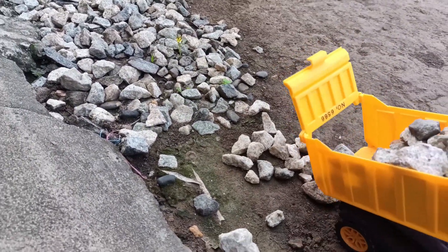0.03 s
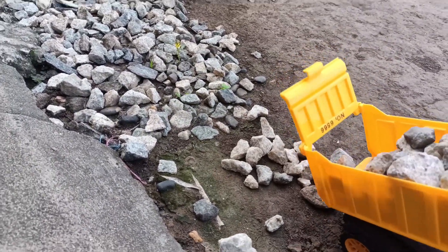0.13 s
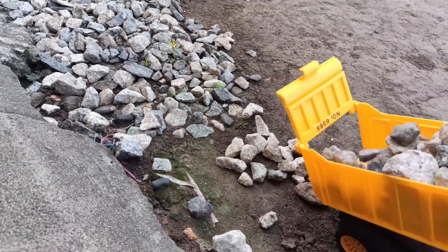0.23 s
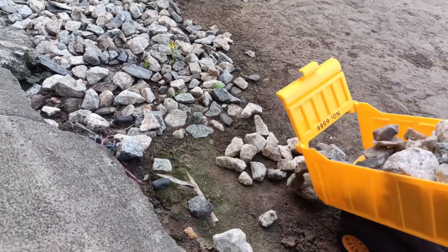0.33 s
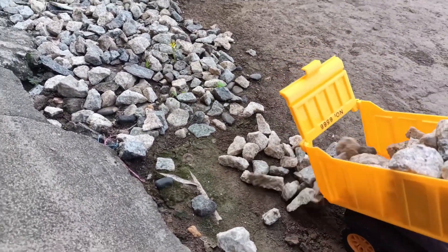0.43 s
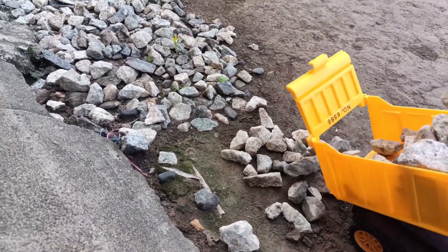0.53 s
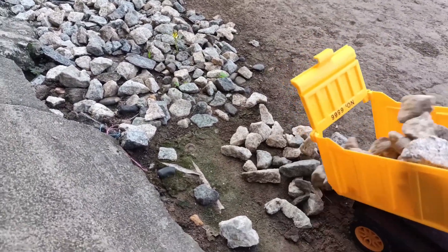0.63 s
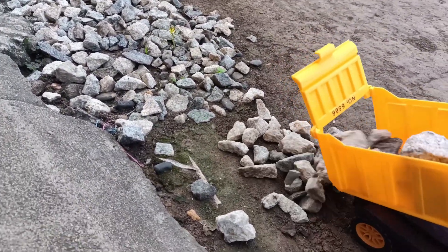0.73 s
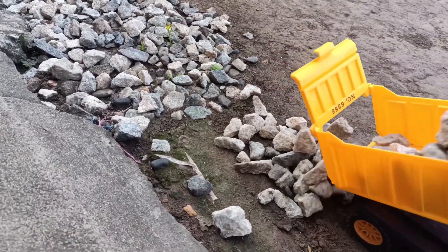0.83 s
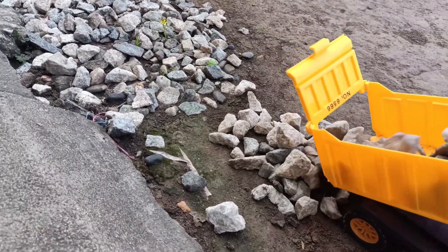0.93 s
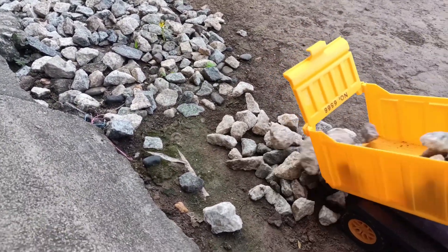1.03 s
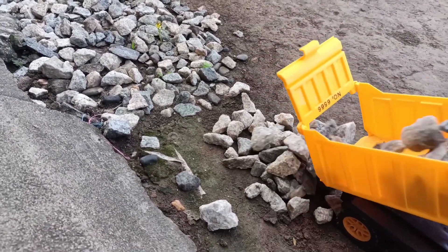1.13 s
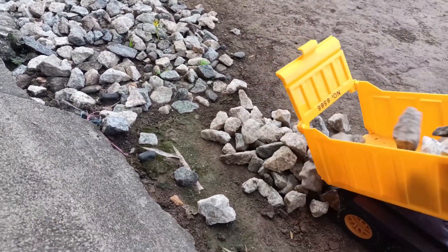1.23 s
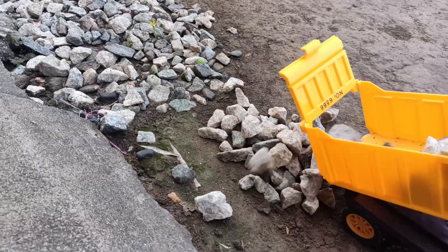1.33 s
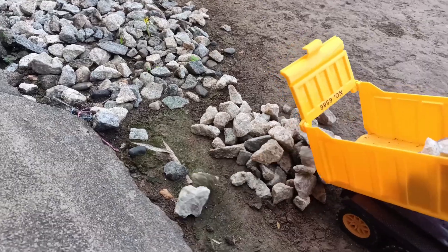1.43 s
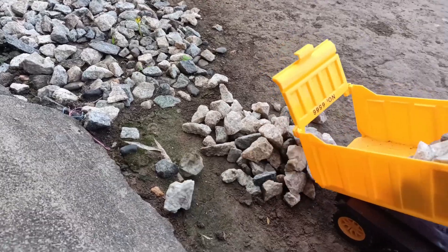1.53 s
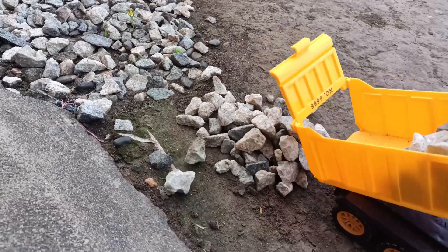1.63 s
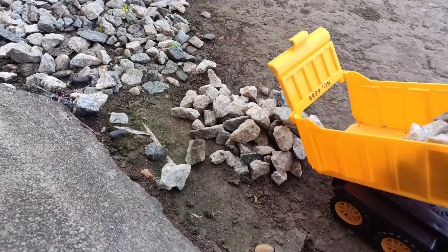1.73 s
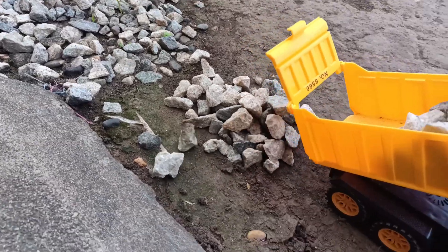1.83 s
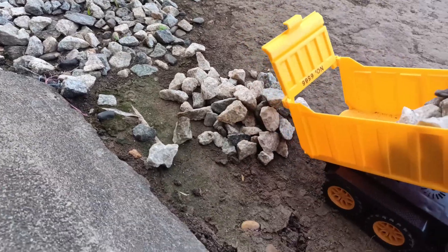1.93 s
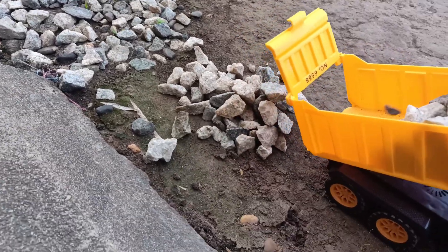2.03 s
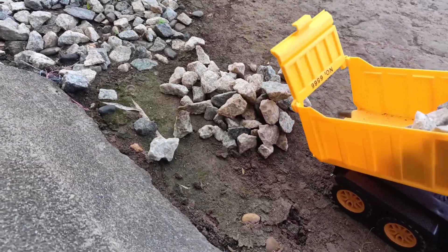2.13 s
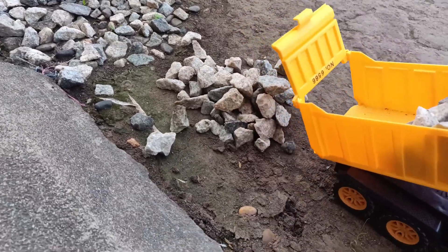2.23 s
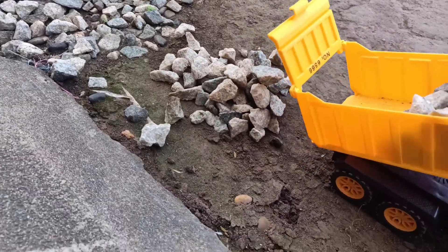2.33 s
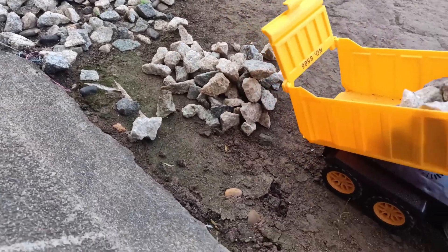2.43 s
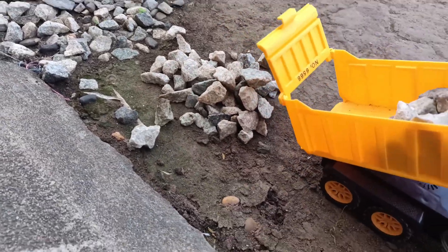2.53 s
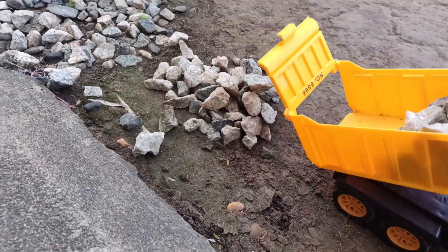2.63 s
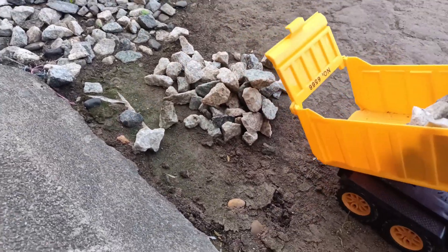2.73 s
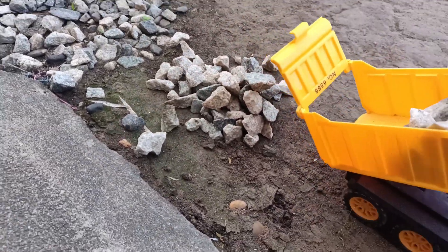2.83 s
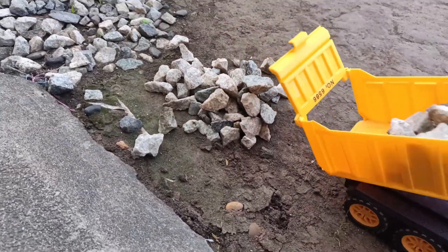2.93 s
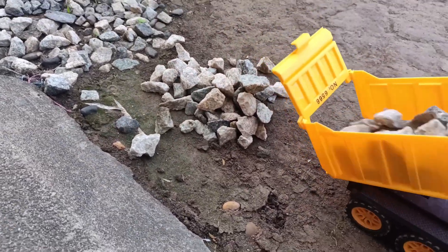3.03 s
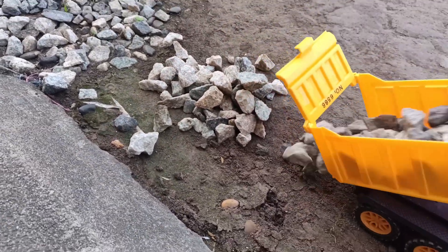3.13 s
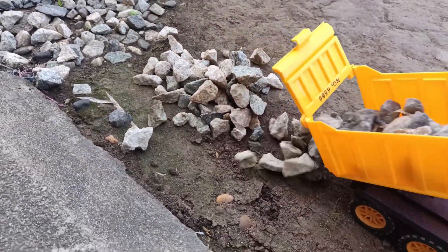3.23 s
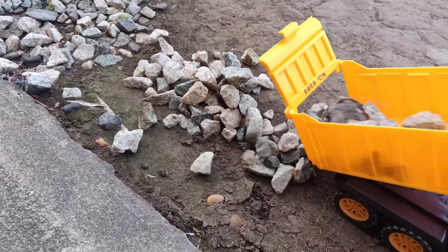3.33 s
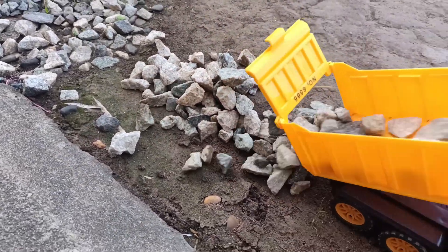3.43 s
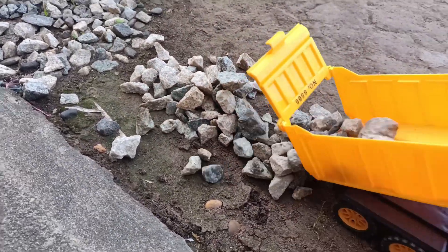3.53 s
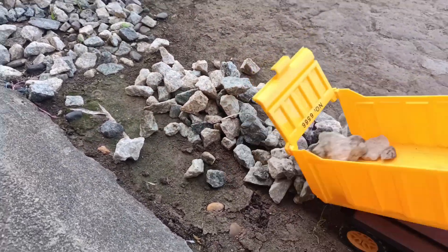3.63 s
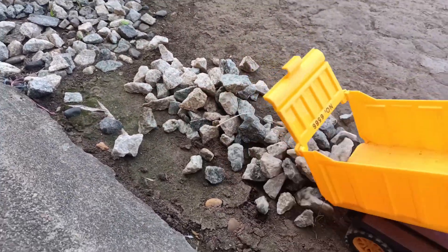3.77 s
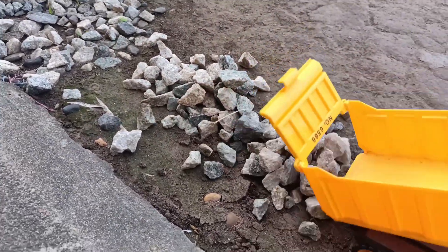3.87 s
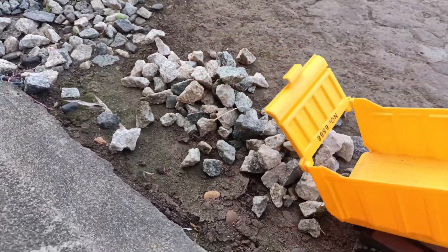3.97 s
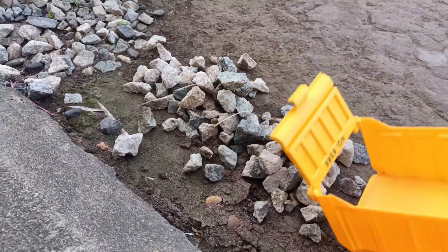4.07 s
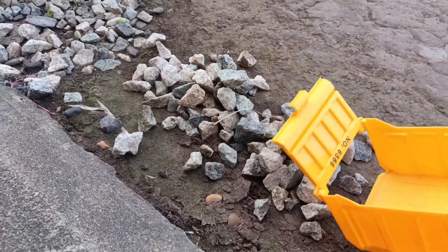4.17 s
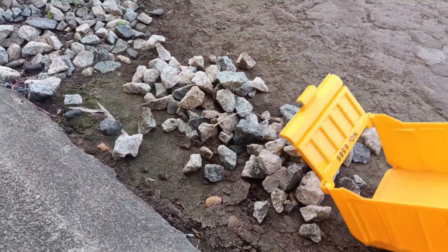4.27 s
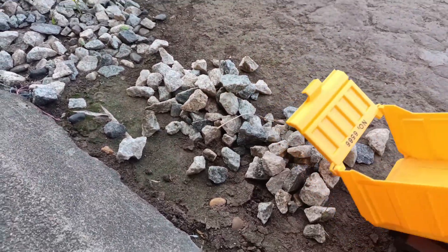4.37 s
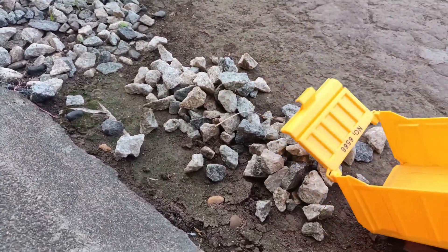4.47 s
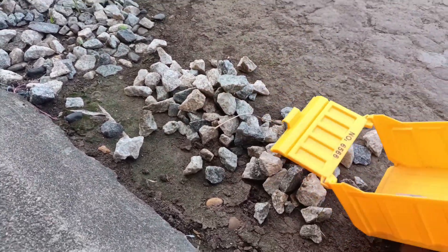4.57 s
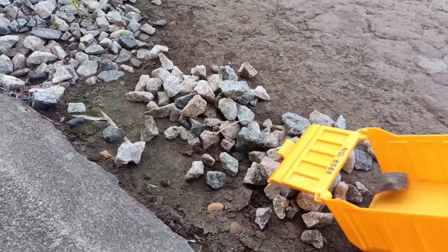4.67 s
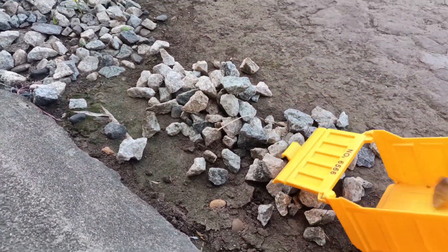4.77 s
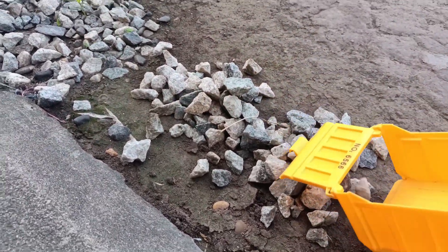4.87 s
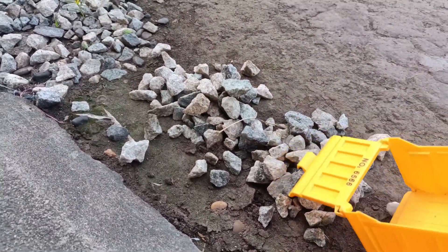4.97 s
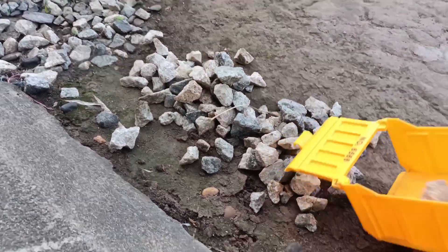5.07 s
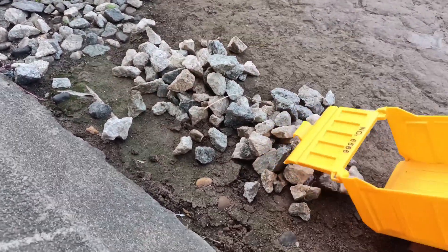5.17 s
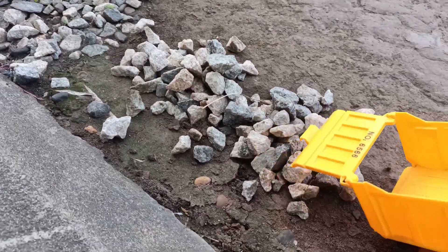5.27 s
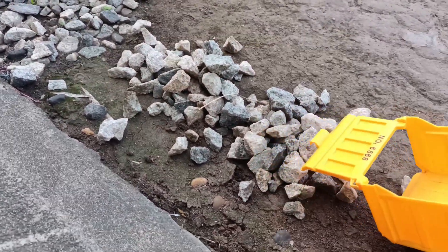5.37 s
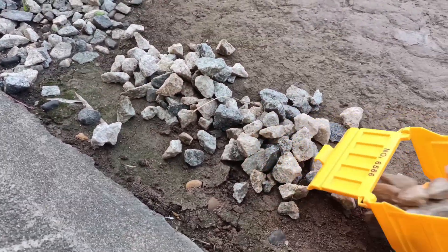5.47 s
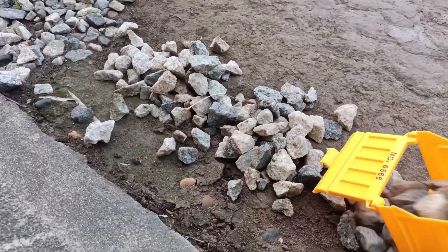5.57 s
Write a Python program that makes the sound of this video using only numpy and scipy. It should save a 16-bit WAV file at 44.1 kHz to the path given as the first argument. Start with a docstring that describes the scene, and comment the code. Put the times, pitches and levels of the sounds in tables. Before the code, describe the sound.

A close, dry stereo outdoor sound of stones leaving a tipped plastic toy truck bed, over very faint air noise. From 0 to 0.4 s short jolts scrape and knock the load. A pour then swells to a dense clatter near 0.75 s and thins after 1 s, with hard plastic clacks, hollow mid-pitched knocks and bright clicks of stone landing on stone. Between about 1.4 and 2.8 s it is sparser and quieter: small scrapes, light rattles, one stronger knock near 2.1 s. At 2.9 s a louder rush bursts out, fullest around 3.1 s and draining by 3.6 s. Irregular jolts and strong boxy knocks continue, busy from 4.1 to 5.1 s, with clicks and a few soft, low dirt thuds. A final heavy pour starts at 5.2 s, swelling to about 5.5 s at the end. The left side is slightly brighter.

```python
"""Gravel slides out of the tipped plastic bed of a toy dump truck, in open air close to two stereo ports.
Over faint air noise, jolts first shift the load; stones scrape and knock, exciting the modes of shell, walls and floor.
Near 0.4, 2.9 and 5.2 s a pour swells and drains, a denser run of random collisions, with jolts between.
From the first pour on, stones click on the heap at their own high pitches; soon after, some thud on damp dirt,
a few broad, low modes."""
import sys
import numpy as np
from scipy import signal
from scipy.fft import rfft, irfft, next_fast_len
from scipy.io import wavfile
from scipy.ndimage import uniform_filter1d, map_coordinates

SR = 44100
rng = np.random.default_rng(int(sys.argv[2]) if len(sys.argv) > 2 else 0)


def bounce(signal):
    """Save signal as a 16-bit WAV file at the path given by the first command-line argument."""
    frames = np.transpose(np.atleast_2d(signal))
    limited = np.clip(frames, -1, 1)
    pcm = np.round(limited * 32767).astype(np.int16)
    wavfile.write(sys.argv[1], SR, pcm)


N = 247036

# outdoor air, relative spectrum: pitch_hz, level_db
AIR_SPECTRUM = [(20, -9), (50, -2), (90, 0), (200, -3), (500, 7), (2000, -5.5), (8000, -86), (16000, -56)]
# the bed is jolted and the load shifts: start_s, length_s, shell_level_db
JOLTS = [(0.055, 0.051, -31.5), (0.135, 0.052, -30), (0.222, 0.063, -31), (0.339, .03, -32),
         (0.396, 0.098, -27), (0.592, 0.029, -25.5), (1.066, 0.021, -29.5), (1.172, 0.11, -29),
         (1.345, 0.0071, -36.5), (1.503, 0.016, -40), (1.603, 0.031, -33), (1.709, 0.04, -33),
         (1.824, 0.017, -38.5), (1.926, 0.068, -38), (2.064, 0.0092, -33.5), (2.151, 0.05, -36),
         (2.265, 0.024, -35), (2.321, 0.049, -34.5), (2.41, 0.073, -38.5), (2.576, .01, -39),
         (2.672, 0.014, -35.5), (2.854, 0.058, -28), (3.407, 0.014, -24.5), (3.477, 0.058, -23),
         (3.641, 0.016, -30.5), (3.722, 0.17, -38), (3.877, 0.013, -29.5), (3.948, 0.11, -34),
         (4.104, 0.017, -24.5), (4.217, 0.024, -30.5), (4.294, 0.068, -25), (4.408, 0.077, -27),
         (4.534, 0.028, -26), (4.685, 0.018, -28.5), (4.772, 0.038, -33.5), (5.042, 0.017, -26.5),
         (5.16, 0.043, -38.5)]
# the bed is tipped and the load runs:
# start_s, fullest_s, runs_out_s, level_at_fullest_db, walls_re_shell_db, floor_re_shell_db
POURS = [(0.375, 0.76, 1.023, -23, -8, -2.5), (2.902, 3.13, 3.6, -18, -7.5, -1),
         (5.215, 5.493, 5.9, -18, -5.5, -3.5)]
# big stones striking the bed: time_s, shell_clack_db, hollow_wall_db (before WALL_BASS), floor_panel_db
KNOCKS = [(0.072, -27, -26, -33), (0.173, -15, -32, -40), (0.275, -27, -55, -29), (0.377, -37, -44, -29),
          (0.401, -21, -43, -31), (0.419, -14.5, -25, -44), (0.46, -19, -29, -18.5),
          (0.569, -17, -51, -21.5), (0.679, -16.5, -26, -20), (0.724, -16, -26, -13.5),
          (0.749, -16.5, -40, -15), (0.759, -21, -34, -30), (0.825, -19, -42, -17.5),
          (0.842, -16, -23, -11.5), (0.873, -15.5, -21, -16), (0.884, -16, -29, -14),
          (0.926, -18, -38, -10), (0.937, -15, -26.5, -18), (0.95, -15.5, -29, -14),
          (0.962, -19, -30, -13.5), (0.982, -12.5, -22, -13.5), (1.026, -19, -43, -13),
          (1.05, -16.5, -29, -19), (1.077, -25, -43, -20), (1.093, -23.5, -45, -19), (1.154, -21, -49, -15),
          (1.171, -22, -22, -18.5), (1.195, -22, -42, -18), (1.218, -13.5, -38, -28),
          (1.224, -17, -14, -29), (1.25, -28, -38, -19), (1.319, -16.5, -16, -24), (1.325, -16, -25, -9.5),
          (1.377, -32, -27, -15.5), (1.603, -23, -35, -40), (1.712, -27, -36.5, -39),
          (1.732, -25.5, -47, -46), (1.804, -21.5, -41, -35), (1.839, -35, -35, -27),
          (1.957, -24, -30, -27), (2.015, -31.5, -52, -31), (2.086, -13.5, -33, -11),
          (2.189, -25, -39, -29), (2.311, -23.5, -37, -36), (2.348, -29, -29.5, -40),
          (2.387, -25.5, -34, -38), (2.445, -28, -44, -38), (2.469, -30.5, -34, -33),
          (2.591, -35, -32.5, -31), (2.741, -52, -35.5, -28.5), (2.819, -26.5, -48, -33),
          (2.92, -17.5, -30, -33), (2.963, -15.5, -28, -32), (3.042, -15.5, -41, -18),
          (3.055, -16.5, -41, -15), (3.175, -14, -15, -15), (3.223, -16, -17, -17),
          (3.239, -16, -19, -15.5), (3.297, -30, -19.5, -18), (3.34, -19, -14, -23),
          (3.414, -18.5, -12.5, -41), (3.453, -19, -11, -33), (3.488, -25, -16.5, -39),
          (3.556, -13.5, -20.5, -27), (3.578, -15, -19.5, -22), (3.592, -18.5, -20.5, -18),
          (3.651, -20.5, -30.5, -36), (3.869, -23, -19.5, -19.5), (3.89, -18.5, -29, -39),
          (3.949, -49, -27, -26), (3.996, -20, -29, -41), (4.044, -20.5, -26, -30), (4.07, -40, -25, -28),
          (4.107, -16, -25, -28), (4.234, -20.5, -26.5, -35), (4.283, -21.5, -51, -23),
          (4.313, -19.5, -19, -14), (4.325, -13, -29, -38), (4.412, -25, -39, -19), (4.464, -12, -37, -28),
          (4.479, -20, -28, -34), (4.531, -16.5, -27, -21), (4.55, -13, -11.5, -16.5),
          (4.595, -20.5, -13, -26), (4.603, -21.5, -16, -12.5), (4.733, -19, -11, -19),
          (4.804, -16, -16, -23), (4.971, -27, -25, -30), (4.996, -19.5, -14.5, -15),
          (5.012, -26, -17.5, -33), (5.037, -18, -22, -27), (5.086, -16.5, -12.5, -20.5),
          (5.385, -30, -28, -16), (5.433, -28, -14.5, -17), (5.476, -19, -31, -15),
          (5.564, -13, -18.5, -26)]
# stones landing hard on the heap: time_s, level_db
CLICKS = [(0.366, -28.5), (0.432, -20.5), (0.495, -20.5), (0.506, -24), (0.516, -21.5), (0.604, -22.5),
          (0.667, -23), (0.741, -23.5), (0.778, -19), (0.834, -23), (1.081, -30), (1.156, -30),
          (1.317, -27), (1.374, -24.5), (1.396, -25.5), (1.412, -29), (1.464, -31), (1.518, -28),
          (1.6, -31.5), (1.725, -39), (1.804, -36), (2.92, -27), (3.262, -23), (3.376, -36), (3.551, -19),
          (3.631, -24.5), (3.673, -23.5), (3.784, -34), (3.812, -34), (3.89, -26.5), (3.933, -29),
          (4.046, -35), (4.123, -23), (4.285, -33), (4.479, -23), (4.591, -30), (4.676, -30.5), (4.71, -25),
          (4.75, -29.5), (4.818, -34), (4.88, -34), (4.914, -36.5), (4.97, -31.5), (5.067, -29),
          (5.19, -26), (5.284, -27)]
# stones hitting the dirt: time_s, level_db
THUDS = [(1.225, -40), (1.466, -37.5), (2.834, -45), (3.454, -52), (3.506, -35), (4.123, -33),
         (4.236, -33.5), (4.477, -34), (4.702, -40)]

# resonances of the plastic bed, before a pressing stone alters them: pitch_hz, width_hz, relative_level_db
SHELL_MODES = [(1620, 690, -6.5), (2265, 325, 0), (2655, 220, 1.5), (3125, 540, -6.5), (4260, 640, -7),
               (5636, 840, -10), (8700, 1170, -25.5), (11000, 2400, -27.5)]
WALL_MODES = [(210, 27.4, -11), (415, 230, -11), (481.5, 85, 2.5), (592, 110, 2), (742, 240, 0)]
FLOOR_MODES = [(869, 133, -7), (1045, 122, -1), (1272, 157, -2), (1480, 226, -5)]
# mean colour of stone on stone, and the soft ground: pitch_hz, width_hz, relative_level_db
STONE_MODES = [(5070, 1340, 9), (8200, 19000, -2), (11240, 3300, 5), (13800, 930, -20)]
DIRT_MODES = [(75, 90, -17), (173, 180, -9), (316, 360, -8.5)]
# colour of a slow contact, weaker near 6 kHz and stronger at the very top: pitch_hz, gain_db
SLOW_CONTACT = [(3000, 1.5), (6000, -3.5), (9000, -0.5), (15000, 4)]
# the small bed radiates little bass when struck: pitch_hz, gain_db
WALL_BASS = [(80, -8), (250, -2.5), (420, 0.5), (2000, -0.5)]

# the right port faces away from the heap; curve shared out between both ports: pitch_hz, gain_db
SHADOW = [(100, -0.5), (600, -1), (1300, -2), (2400, -1), (4400, -1.5), (6000, -3.5), (8500, -13),
          (15000, -12.5)]
# bearing of the truck: time_s, right_port_lag_ms
PORT_LAG_MS = [(0, 0.21), (1.4, 0.24), (2.1, 0.31), (3.6, 0.26), (4.5, 0.4), (5.6, 0.3)]

RING = 3072  # samples kept of each blow
TOP_HZ = 16000
# how fast the stones get moving and come to rest
START_DB_PER_S, STOP_DB_PER_S = 484, 171.5
# a pour swells towards its fullest moment and drains after it
SWELL_DB_PER_S, DRAIN_DB_PER_S = 31, 29
# the heap settles after a pour with this time constant; the load never lies quite still
SETTLE_S, CREEP_DB = 0.15, -47.5
# walls and floor in a jolt, relative to the shell
JOLT_WALL_DB, JOLT_FLOOR_DB = -4.5, -3.5
# the heap relative to the pour; patter on the dirt relative to the heap, at the heaviest spill
HEAP_DB, DIRT_DB = -8.5, -12
# a stone stiffens the panel that it strikes: factor on its pitches
WALL_STIFFEN, FLOOR_STIFFEN = 1.108, 1.035
# small random knocks and clicks: level relative to the drives, and scatter
RATTLE_DB, RATTLE_SPREAD_DB, PATTER_DB, PATTER_SPREAD_DB = -3, 5, -0.5, 9.5


def amp(db):
    """Amplitude ratio of a level in decibels."""
    return 10 ** (np.asarray(db) / 20)


def unit(x):
    """Normalization of a signal to an rms of one."""
    return x / np.sqrt(np.mean(x ** 2))


def curves(table):
    """Linear interpolation of each column of a time table at every sample."""
    s, *columns = np.transpose(table)
    return [np.interp(np.arange(N) / SR, s, c) for c in columns]


def colour(x, points, share=1):
    """Linear filtering by a (Hz, dB) gain curve, its decibels scaled by share."""
    hz, db = np.transpose(points)
    size = next_fast_len(N + RING)
    f = np.arange(size // 2 + 1) * SR / size
    gain = amp(share * np.interp(np.log(f + 1), np.log(hz), db))
    return irfft(rfft(x, size) * gain, size)[..., :N]


def port_noise(count, size, apart):
    """Partial coherence: noise (count, 2 ports, size); apart is the power share not common to the ports."""
    noise = rng.standard_normal((count, 3, size))
    apart = np.clip(apart, 0, 1)
    return np.sqrt(1 - apart) * noise[:, :1] + np.sqrt(apart) * noise[:, 1:]


def body(modes, detune=1, spot_db=0, count=1):
    """Modal superposition: response of damped modes to count blows; the spot that is hit favours some modes."""
    f = np.arange(RING // 2 + 1) * SR / RING + 1
    spot = spot_db * rng.standard_normal((count, len(modes), 1, 1))
    response = 0
    for k, (hz, width, db) in enumerate(modes):
        offset = 1j * (f / (hz * detune) - hz * detune / f)
        resonance = (-1) ** k * amp(db + spot[:, k]) / (1 + offset * hz / width)
        # a mode radiates well only within about an octave of its pitch
        response = response + resonance / (1 + 0.64 * offset)
    return response


def movement(start, end):
    """Transient of a moving load: it gets going quickly, holds, and comes to rest more slowly."""
    t = np.arange(N) / SR
    return amp(-START_DB_PER_S * np.maximum(start - t, 0) - STOP_DB_PER_S * np.maximum(t - end, 0))


def load_motion():
    """Addition of powers: jolts and pours give the gain curves that drive shell, walls, floor and heap."""
    t = np.arange(N) / SR
    jolts = amp(CREEP_DB) ** 2
    for start, length, db in JOLTS:
        jolts = jolts + (amp(db) * movement(start, start + length)) ** 2
    # a jolt spills nothing on the heap
    power = np.outer([1, amp(JOLT_WALL_DB) ** 2, amp(JOLT_FLOOR_DB) ** 2, 0], jolts)
    keep = np.exp(-1 / (SETTLE_S * SR))
    for start, fullest, end, db, wall_db, floor_db in POURS:
        below_db = np.maximum(SWELL_DB_PER_S * (fullest - t), DRAIN_DB_PER_S * (t - fullest))
        pour = amp(db - below_db) * movement(start, end)
        heap = signal.lfilter([1 - keep], [1, -keep], pour)
        power += np.array([pour, pour * amp(wall_db), pour * amp(floor_db), heap * amp(HEAP_DB)]) ** 2
    return np.sqrt(power)


def contacts(per_s, spread_db):
    """Random arrivals: energy of tiny collisions, many weak and a few strong."""
    chance = rng.random(N)
    size = np.minimum(rng.standard_normal(N), 2)
    return (chance < per_s / SR) * amp(spread_db * size) ** 2


def scrape(energy, modes, grain_s, rub, apart):
    """Forced vibration: decaying bursts of noise over smooth rubbing excite a body; the rms is one."""
    power = signal.lfilter([1], [1, -np.exp(-1 / (grain_s * SR))], energy)
    power = power / np.mean(power) + rub
    # the load shares out its momentum: a strong collision leaves less for its neighbours
    power /= uniform_filter1d(power, size=2600)
    force = np.sqrt(power) * port_noise(1, N, apart)[0]
    impulse_response = irfft(body(modes))[0]
    return unit(signal.fftconvolve(force, impulse_response)[:, :N])


def strike(times, db, response, crunch_s, snap, tail_db, tail_s, apart):
    """Impact excitation: a sharp push, a crunch as rough stone seats and a faint rattle pass through a body."""
    t = np.arange(RING) / SR
    # crunch_s and tail_s are times to fall by 60 dB
    fade = amp(-60 * t / crunch_s) + amp(tail_db - 60 * t / tail_s)
    force = port_noise(len(times), RING, apart) * fade / np.sqrt(np.sum(fade ** 2))
    force[..., 0] += snap
    blows = irfft(rfft(force) * response)
    # the energy of a blow, spread over 6 ms, has an rms of one
    blows /= np.sqrt(np.sum(blows ** 2, axis=(1, 2), keepdims=True) / (2 * 0.006 * SR))
    out = np.zeros((2, N + RING))
    for s, gain, blow in zip(times, amp(db), blows):
        start = int(np.clip(s * SR, 0, N - 1))
        out[:, start:start + RING] += gain * blow
    return out[:, :N]


def strays(drives, level_db, spread_db, count):
    """Stratified random arrivals: rows (s, dB, ..) of small blows whose levels scatter about the drives."""
    draw = rng.random((count, 1 + len(drives)))
    times = (np.arange(count) + draw[:, 0]) / count * (N - 1) / SR
    drive_db = 20 * np.log10(drives[:, (times * SR).astype(int)].T)
    scatter_db = spread_db * np.sqrt(3) * (2 * draw[:, 1:] - 1)
    return np.column_stack([times, drive_db + level_db + scatter_db])


def outdoor_air():
    """Broadband noise: random pressure shaped by the spectrum of the air, partly common to both ports."""
    noise = port_noise(1, N, apart=0.26)[0]
    return amp(-48.5) * unit(colour(noise, AIR_SPECTRUM))


def sliding_load(drives):
    """Granular flow: the faster stones tumble over plastic and stone, the denser the collisions."""
    on_shell, on_walls, on_floor, on_heap = drives
    flow = np.sqrt(on_shell / np.max(on_shell))
    on_bed = contacts(300 + 600 * flow, spread_db=5.5)
    on_stone = contacts(170 + 500 * flow, spread_db=6)
    shell = scrape(on_bed, SHELL_MODES, grain_s=0.002, rub=0.07, apart=1.0)
    # a slow stone has another colour, with less around 6 kHz
    slow = colour(shell, SLOW_CONTACT)
    shell = slow + flow * (shell - slow)
    walls = scrape(on_bed, WALL_MODES, grain_s=0.002, rub=0.026, apart=0.021)
    floor = scrape(on_bed, FLOOR_MODES, grain_s=0.0007, rub=0.32, apart=0.42)
    stones = scrape(on_stone, STONE_MODES, grain_s=0.0016, rub=0.087, apart=0.99)
    # only a heavy spill patters on the ground, too lightly for its deepest thump
    spill = np.sqrt(on_heap / np.max(on_heap))
    dirt = scrape(on_stone, DIRT_MODES[1:], grain_s=0.03, rub=0.12, apart=0.1)
    dirt = dirt * spill * amp(DIRT_DB)
    return shell * on_shell + walls * on_walls + floor * on_floor + (stones + dirt) * on_heap


def knocks(drives):
    """Contact damping: big stones and small rattling ones press on the bed, widening and shifting its modes."""
    rattle = strays(drives, RATTLE_DB, RATTLE_SPREAD_DB, count=150)
    times, shell_db, wall_db, floor_db = np.vstack([rattle, KNOCKS]).T
    count = len(times)
    detune = np.exp(0.035 * rng.standard_normal((count, 1, 1)))
    pressed_shell = [(hz, 1.3 * width, db) for hz, width, db in SHELL_MODES]
    shell_ring = body(pressed_shell, detune, spot_db=1.8, count=count)
    # blows ring only the upper modes of the walls
    pressed_walls = [(hz, 1.09 * width, db) for hz, width, db in WALL_MODES[2:]]
    wall_ring = body(pressed_walls, detune * WALL_STIFFEN, spot_db=4.0, count=count)
    floor_ring = body(FLOOR_MODES, detune * FLOOR_STIFFEN, spot_db=2.0, count=count)
    shell = strike(times, shell_db, shell_ring, crunch_s=0.01, snap=0.5, tail_db=-11, tail_s=0.05, apart=0.7)
    walls = strike(times, wall_db, wall_ring, crunch_s=0.01, snap=1.1, tail_db=-16, tail_s=0.079, apart=0.065)
    floor = strike(times, floor_db, floor_ring, crunch_s=0.006, snap=1.4, tail_db=-23, tail_s=0.055, apart=0.3)
    return shell + colour(walls, WALL_BASS) + floor


def heap_clicks(drives):
    """Free vibration of small solids: each stone rings briefly at its own high pitches, lower if it is larger."""
    patter = strays(drives, PATTER_DB, PATTER_SPREAD_DB, count=110)
    times, db = np.vstack([patter, CLICKS]).T
    count = len(times)
    stone_size = np.exp(0.11 * rng.standard_normal((count, 1, 1)))
    own_ring = body([(7800, 800, 1), (10600, 950, 4)], 1 / stone_size, spot_db=2.5, count=count)
    ring = body(STONE_MODES) + own_ring
    return strike(times, db, ring, crunch_s=0.006, snap=0.3, tail_db=-17, tail_s=0.03, apart=0.7)


def dirt_thuds():
    """Heavily damped impact: soft ground answers a stone with a few broad, low modes."""
    times, db = np.transpose(THUDS)
    ground = body(DIRT_MODES)
    return strike(times, db, ground, crunch_s=0.022, snap=0.5, tail_db=-20, tail_s=0.06, apart=0.15)


def scene():
    """Superposition of the truck, the heap and the dirt over faint outdoor air."""
    drives = load_motion()
    truck = sliding_load(drives) + knocks(drives[:3])
    return outdoor_air() + truck + heap_clicks(drives[3:]) + dirt_thuds()


def record(dry):
    """Path difference and shadowing make the right port later and duller; peaks are rounded, the top is cut."""
    left = colour(dry[0], SHADOW, share=-0.53)
    right = colour(dry[1], SHADOW, share=0.91)
    lag_ms, = curves(PORT_LAG_MS)
    late_right = map_coordinates(right, [np.arange(N) - lag_ms * SR / 1000])
    ports = np.array([left, late_right])
    # only the highest peaks are rounded
    rounded = ports / (1 + (ports / 0.95) ** 8) ** (1 / 8)
    top_cut = signal.ellip(10, 0.2, 70, TOP_HZ, fs=SR, output="sos")
    return signal.sosfilt(top_cut, rounded)


dry = scene()
out = record(dry)
bounce(out)
```